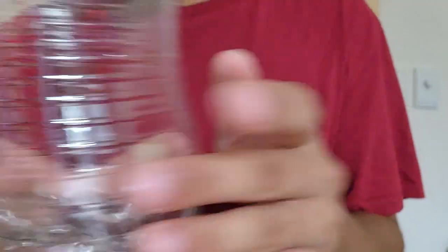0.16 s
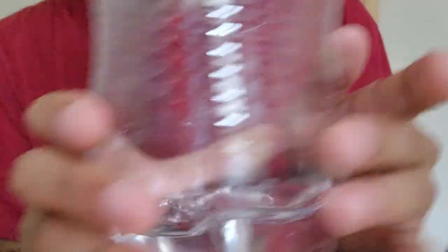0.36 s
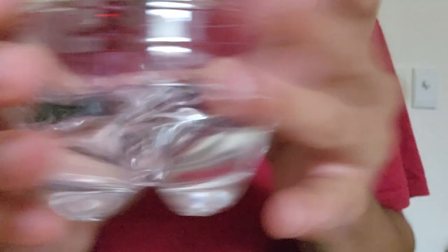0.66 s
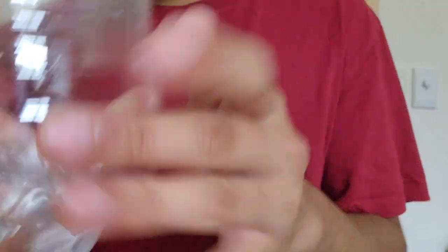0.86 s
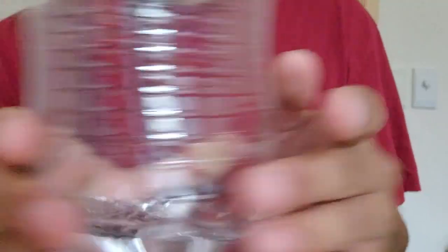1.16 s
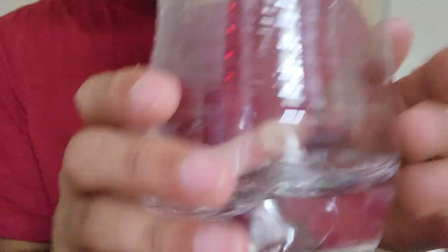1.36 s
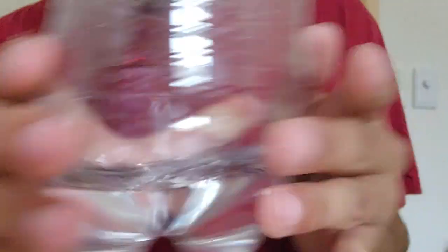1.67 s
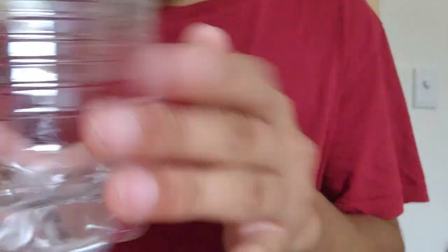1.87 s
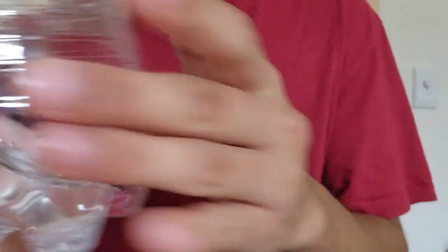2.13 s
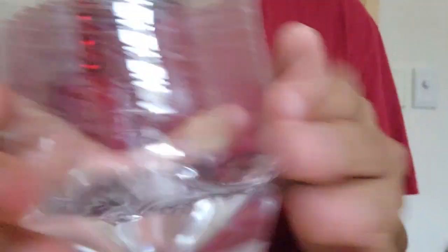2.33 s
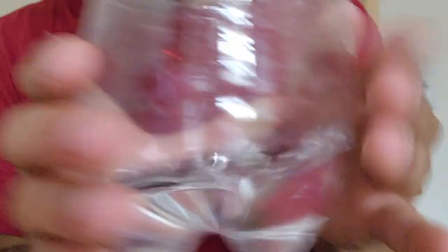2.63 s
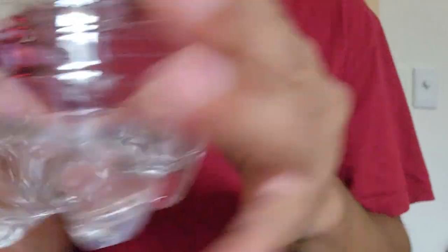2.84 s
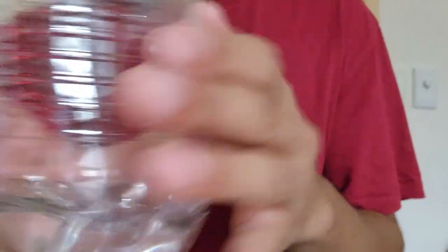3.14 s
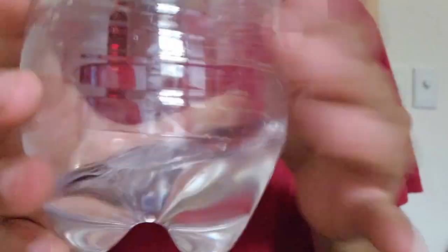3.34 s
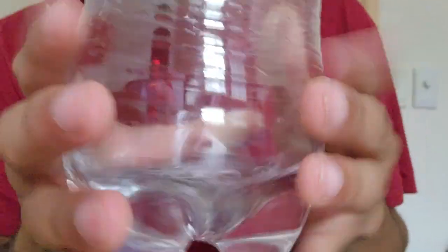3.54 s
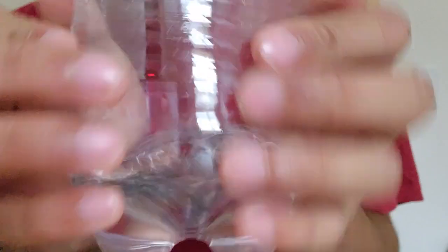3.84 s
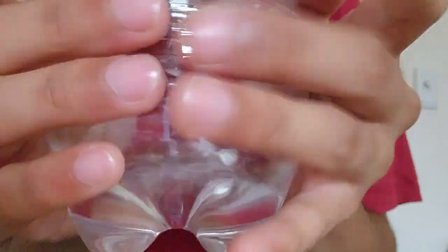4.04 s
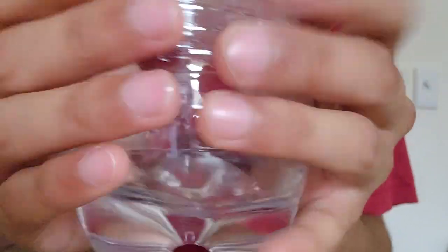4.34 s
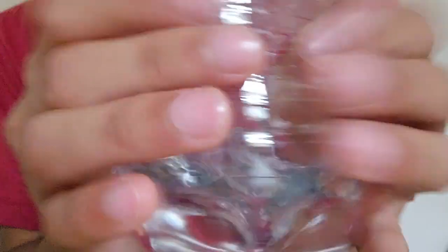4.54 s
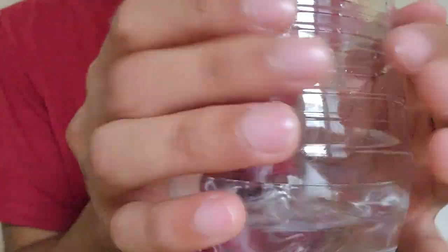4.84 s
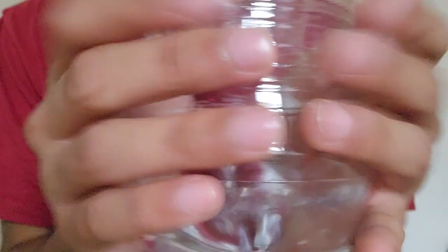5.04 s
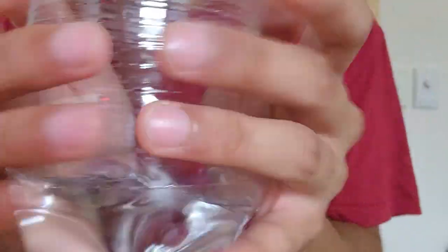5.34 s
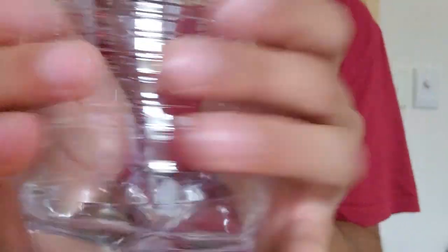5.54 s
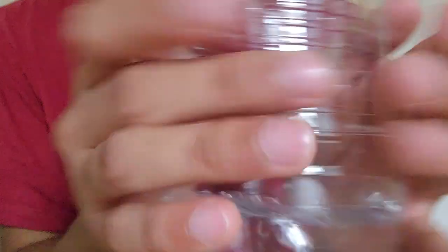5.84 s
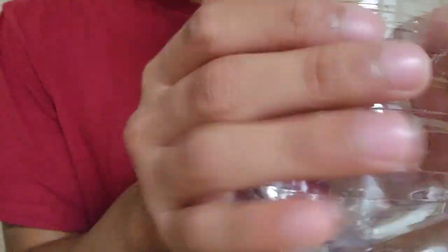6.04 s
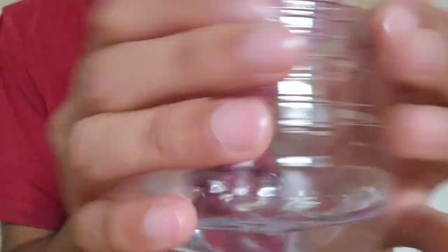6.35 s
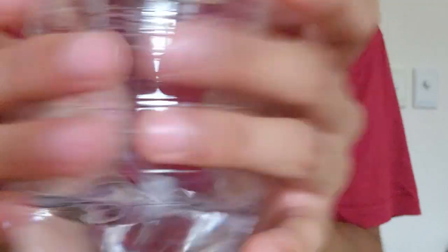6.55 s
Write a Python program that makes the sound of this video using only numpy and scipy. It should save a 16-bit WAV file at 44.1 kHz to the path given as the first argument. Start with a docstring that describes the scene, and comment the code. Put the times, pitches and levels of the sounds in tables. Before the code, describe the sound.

Close, quick crackling taps and soft thumps on a ridged plastic bottle turn into denser, brighter crunching as hands squeeze it.

```python
"""Sharp cracks and hollow knocks: fingers drum on a thin ridged plastic bottle, then squeeze it.
Each blow snaps the wall, knocks the shell's modes, pushes a low puff of air and stirs the air and
water inside. Between blows, creases snap and tick, skin slides on the plastic and the held bottle
rumbles. It is right at a faintly hissing microphone in a small room."""
import sys
import numpy as np
from scipy import signal
from scipy.fft import rfft, irfft
from scipy.io import wavfile
from scipy.ndimage import uniform_filter1d

SR = 44100
rng = np.random.default_rng(int(sys.argv[2]) if len(sys.argv) > 2 else 0)


def digitize_waveform(pressure):
    """Quantize a signal to 16-bit integers and store it at the path in sys.argv[1].

    Rows of a 2-D input are taken as channels; values are limited to [-1, 1].
    """
    field = np.atleast_2d(pressure).T
    bounded = np.clip(field, -1, 1)
    quanta = np.round(bounded * 32767).astype(np.int16)
    wavfile.write(sys.argv[1], SR, quanta)


N = 295470
SQUEEZE_S = 4.0  # from here both hands wrap the wall and squeeze
TAILS = 3  # random room tails, shared in turn among the cracks

# Finger blows that dent the wall: (time [s], crack level [dB], nominal crack length [ms],
# knock over crack [dB], spot pitch [Hz], brightness [dB], thump level [dB], thump pitch [Hz])
BLOWS = [(0.0329, -16.5, 6.3, -17, 604, -30, -12.5, 56), (0.1404, -22, 3.3, -3.5, 1500, -2, -14, 74.5),
         (0.2106, -18.5, 4.7, -10, 470, -4.5, -12.5, 80.7), (0.329, -16.5, 1.7, -10, 746, -3, -16.5, 72),
         (0.4005, -19, 4.1, -2, 512, -1, -14, 81.3), (0.4968, -16.5, 2.6, -6.5, 960, -2.5, -14.5, 50),
         (.581, -18, 5, -18, 1170, -10, -15, 68.6), (0.652, -9.5, 5.5, -2, 659, -4.5, -8.5, 99),
         (.739, -9, 2.1, -25, 1080, -7, -14.5, 81.5), (0.752, -32, 9.3, 0, 810, -2, -13.5, 50.4),
         (0.8394, -29.5, 2.5, -7.5, 885, 0, -21, 62.5), (0.8958, -17, 6.4, -33, 875, -6, -15, 55),
         (0.9784, -14, 4.2, -22, 647, -3.5, -7.5, 75), (1.0481, -18.5, 7, -9, 535, -12, -10, 54.4),
         (1.151, -23.5, 7.1, -4, 990, -17, -19.5, 53), (1.211, -21, 5.5, -5, 543, -2, -15, 84),
         (1.2927, -11, 3.3, -2.5, 480, -2, -12.5, 96.4), (1.378, -17.5, 4.8, -7.5, 503, -5.5, -16.5, 81.5),
         (1.4652, -18, 4.1, -1.5, 786, -6.5, -18.5, 100), (1.5455, -18, 3.6, -4, 685, -4.5, -25, 86),
         (1.6329, -17.5, 7.4, -4.5, 704, -5, -14.5, 74), (1.704, -22, 5.6, -9.5, 1060, -7, -19, 66),
         (1.7912, -17, 6, 0.5, 690, -9.5, -14.5, 81), (1.872, -17, 3.1, -5, 556, -9, -13.5, 80),
         (1.969, -19.5, 4.8, 1.5, 593, -4, -13.5, 84.4), (2.0246, -14, 2.8, -2.5, 515, -4.5, -9.5, 113.6),
         (2.127, -30.5, 3.4, -6.5, 600, -5, -31, 73), (2.1807, -19, 4.7, -17, 484, -4, -12, 62.4),
         (2.2628, -14, 4.7, -1, 673, -2.5, -6.5, 79.6), (2.322, -18.5, 4.5, -24, 480, -9, -16, 74.6),
         (2.407, -10.5, 3.1, -2.5, 693, -6, -8.5, 70), (2.4959, -28, 2.3, -4, 525, -19, -22, 71),
         (2.5767, -13.5, 6.6, -1, 582, -7, -7.5, 73), (2.628, -17, 0.77, -53, 805, -12, -17, 77.5),
         (2.7123, -13, 6.1, -5.5, 670, -7.5, -18, 72), (2.7841, -20, 3.8, -14, 626, -6.5, -18.5, 63.6),
         (2.878, -8.5, 5, -2.5, 530, -5.5, -8.5, 66.4), (2.944, -13.5, 2.4, -31, 590, -3.5, -11.5, 77),
         (2.956, -20, 9.4, 2, 565, -7, -11.5, 50.4), (3.183, -24, 4.1, -0.5, 780, -5, -11, 66),
         (3.204, -8.5, 4.5, 6, 915, -2.5, -3, 55.6), (3.403, -14.5, 4, 0.5, 784, -4.5, -12.5, 104),
         (3.501, -20.5, 7.4, -8, 725, 0.5, -13.5, 76), (3.5892, -23.5, 9.5, -2, 562, 0, -17, 42.6),
         (3.6069, -13, 4.5, -4.5, 834, -2, -7, 77), (4.1032, -26.5, 8.8, -4, 830, -10, -17, 49.3),
         (4.181, -11.5, 2.5, -7, 850, 0, -14.5, 56.7), (4.2543, -18.5, 6, -5, 920, -4, -19, 91),
         (4.3498, -18, 4.1, -5, 936, -2, -17, 54), (4.4037, -12, 3.7, -14, 936, -3, -19, 82),
         (4.539, -19, 4, -7.5, 830, -2, -13, 59), (4.636, -15, 2.4, -6.5, 690, -2, -14, 60.6),
         (4.6939, -10, 6.8, -14, 970, -8, -14, 56.4), (4.778, -19.5, 7.6, -3.5, 694, -3.5, -22.5, 83),
         (4.839, -19, 6.4, -16, 670, -4.5, -16.5, 51), (5.0569, -14, 6.1, -6, 460, -5.5, -9.5, 58),
         (5.1302, -8, 7, -5.5, 511, -5, -9.5, 51), (5.261, -12, 6.1, -13.5, 630, -5, -10.5, 51),
         (5.342, -14.5, 6.4, 3.5, 703, -7, -8, 73), (5.4096, -11.5, 5.6, -11.5, 517, -4.5, -10, 53.5),
         (5.553, -17.5, 6.1, -7.5, 694, -2.5, -13.5, 57.5), (5.645, -36, 4.3, 6, 920, -17, -24, 61.3),
         (5.712, -8.5, 11.2, -15, 600, -5, -8.5, 47.6), (5.8019, -24, 1, -1, 704, -13, -16, 47),
         (5.8592, -7, 4.4, -13, 620, -7, -13, 55), (6.0063, -15.5, 2.6, -8.5, 645, -4, -16.5, 71),
         (6.099, -18, 3.8, -4.5, 796, -5, -12, 57), (6.169, -6.5, 10.7, -9, 775, -4, -12, 53),
         (6.4046, -29.5, 5.4, 3.5, 800, -2.5, -18, 57.6), (6.6161, -7, 5, -10, 920, -4.5, -11, 54.7)]
def blows():
    """Each finger blow cracks a wall panel and knocks the shell; squeezed panels sing higher, sharper."""
    out = np.zeros((TAILS, N))
    for k, (s, db, length_ms, knock_db, spot_hz, bright_db, _, _) in enumerate(BLOWS):
        centre_hz, peak_db = (2720, 3.5) if s < SQUEEZE_S else (3550, 8.5)
        panel_hz = centre_hz * 2 ** rng.normal(0, 0.55)
        add(out[k % TAILS], s, crack(db, length_ms, bright_db, panel_hz, peak_db, width_oct=0.39))
        add(out[k % TAILS], s, knock(db + knock_db, spot_hz))
    return out


# Snapping creases: (time [s], crack level [dB], panel pitch [Hz], knock level [dB])
CREASES = [(0.099, -25.5, 4820, -29.5), (0.2266, -30, 2590, -45), (0.276, -27, 4030, -39),
           (0.4155, -33, 4110, -26), (0.4535, -29, 2920, -31), (1.1025, -30, 2300, -28.5),
           (1.2224, -24, 3870, -33), (1.2595, -31, 2210, -32), (1.4294, -31, 2540, -33),
           (1.7547, -30.5, 2300, -35), (1.844, -35, 2750, -31.5), (1.911, -26.5, 2250, -27.5),
           (1.9857, -33, 2240, -35), (2.0652, -28.5, 2480, -47), (2.2146, -23, 2300, -29),
           (2.3755, -28.5, 2740, -32), (3.1031, -27.5, 2760, -23.5), (3.2755, -27, 2310, -27),
           (3.304, -21.5, 5000, -21), (3.3232, -22.5, 8560, -26), (3.3593, -33, 2800, -29.5),
           (3.5142, -18.5, 2230, -20.5), (3.7212, -22, 4820, -25), (4.1184, -29, 4140, -52),
           (4.132, -25.5, 3460, -55), (4.1692, -26, 3680, -35), (4.2135, -20.5, 4050, -38),
           (4.2466, -21, 4070, -37), (4.2627, -21, 2480, -33), (4.275, -24, 2930, -26.5),
           (4.474, -18.5, 4080, -40), (4.4977, -24, 2330, -33), (4.5517, -17.5, 3320, -40),
           (4.565, -27.5, 3560, -46), (4.5996, -22, 4850, -33), (4.6078, -23, 3500, -35),
           (4.629, -16, 2670, -28), (4.6404, -22, 4400, -38), (4.706, -22, 3500, -26),
           (4.7523, -21, 4800, -26.5), (4.8209, -26, 2280, -34), (4.8785, -21.5, 3750, -39),
           (4.8934, -29.5, 2380, -41), (5.066, -32, 4460, -34), (5.1054, -27.5, 2200, -33),
           (5.1622, -23, 2270, -41), (5.287, -22.5, 4470, -46), (5.3091, -24, 2450, -33),
           (5.3893, -29, 6000, -24), (5.456, -20.5, 4540, -35), (5.6052, -21, 4050, -32.5),
           (5.6254, -26.5, 7200, -40), (5.6754, -29, 3010, -35), (5.7667, -22, 2290, -30),
           (5.7954, -19, 2810, -42), (5.8354, -23, 2960, -42), (5.8542, -12.5, 3020, -17),
           (5.919, -22.5, 3500, -38), (5.954, -24.5, 8220, -31), (5.9803, -33, 3015, -35),
           (6.0159, -10, 3340, -23.5), (6.0276, -23, 4310, -44), (6.0695, -20.5, 2800, -46),
           (6.1439, -24, 2870, -27.5), (6.2142, -25.5, 4510, -35), (6.24, -24.5, 8290, -29),
           (6.2543, -23, 2410, -31), (6.2668, -21, 3230, -29.5), (6.304, -26, 2780, -39),
           (6.326, -24, 4600, -34), (6.3417, -28, 3380, -50)]
def creases():
    """Creases crack and knock without moving the wall much."""
    out = np.zeros((TAILS, N))
    for k, (s, db, panel_hz, knock_db) in enumerate(CREASES):
        length_ms = 5 * 2 ** rng.normal(0, 0.4)
        snap = crack(db, length_ms, bright_db=-4.5, panel_hz=panel_hz, peak_db=7.5, width_oct=0.72)
        add(out[k % TAILS], s, snap)
        add(out[k % TAILS], s, knock(knock_db, spot_hz=559))
    return out


# Spectrum of cracking plastic: (frequency [Hz], level [dB])
CRACK_SPECTRUM = [(300, -11), (1200, 4), (2500, -1.5), (4000, -1), (6500, 0.5), (8800, 12.5), (11000, 6),
                  (16000, -4.5)]
def crack(db, length_ms, bright_db, panel_hz, peak_db, width_oct):
    """Plastic gives way in a volley of uneven slips, hardest at first; the wall buzzes on, duller."""
    t = np.arange(2048) / SR
    noise, slips = rng.standard_normal((2, len(t)))
    panel = [(panel_hz / 2 ** width_oct, 0), (panel_hz, peak_db), (panel_hz * 2 ** width_oct, 0)]
    burst = unit_rms(shaped(shaped(noise, panel), CRACK_SPECTRUM, tilt_db=0.9 * (bright_db - 3.5)))
    ragged = gain(10.35 * np.tanh(0.68 * unit_rms(uniform_filter1d(slips, size=12))))
    volley = (1 + 0.62 * np.exp(-t / 0.00063)) * np.exp(-(t / (0.00068 * length_ms)) ** 1.42)
    buzz_fade = 0.38 * np.exp(-t / 0.0061) + 0.052 * (1 - t / t[-1])
    buzz = buzz_fade * uniform_filter1d(burst[::-1], size=3)
    rise_s = 0.00063 * (length_ms / 6.04) ** 1.92  # long cracks build slowly
    return gain(db - 5.5) * rise(t, rise_s) ** 2 * (burst * ragged * volley + buzz)


# Shell modes: (frequency [Hz], level [dB], t60 [s])
SHELL_MODES = [(310.5, -4.5, 0.32), (484.5, 2.5, 0.13), (615, -0.5, 0.11), (812.5, 0.5, 0.014),
               (917, -1.5, 0.19), (1292, -1, 0.16), (2277, 4.5, 0.059), (2770, 8, 0.027)]
def knock(db, spot_hz):
    """The dent pops and knocks modes near its pitch; they ring on faintly, blurred by the moving hands."""
    t = np.arange(4400) / SR
    out = gain(5.5) * decay(t, 0.023) * np.sin(2 * np.pi * spot_hz * t)
    for hz, mode_db, t60_s in SHELL_MODES:
        detune, strength = rng.uniform(-0.5, 0.5, 2)
        coupling_db = max(-14 * np.log2(hz / spot_hz) ** 2, -18)
        hit_phase = 2 * np.pi * (hz * (1 + 0.14 * detune) * t + rng.random())
        hit = gain(coupling_db) * decay(t, 0.039) * np.sin(hit_phase)
        ring_phase = 2 * np.pi * hz * (1 + 0.032 * detune) * t
        blur = [np.interp(0.198 * hz * t, np.arange(96), row) for row in rng.standard_normal((2, 96))]
        blurred = blur[0] * np.sin(ring_phase) + blur[1] * np.cos(ring_phase)
        ring = gain(0.46 * coupling_db - 17) * decay(t, t60_s) * blurred
        out += gain(mode_db + 6 * strength) * (hit + ring)
    out *= rise(t, 0.0017)
    return gain(db + 1.5) * out / abs(out).max()


# Low thumps of the wall between finger blows, some beside a crease snap:
# (time [s], peak [dB], settled pitch [Hz], t60 [s])
WALL_THUMPS = [(0.114, -17, 56.7, 0.33), (0.224, -12, 49.6, 0.024), (0.919, -19, 66.6, 0.15),
               (1, -19.5, 61.6, 0.94), (2.039, -7.5, 51, 0.058), (3.07, -11.5, 72, 0.38),
               (3.735, -20, 151, 0.016), (3.744, -10.5, 67, 0.074), (3.794, -17, 52.5, 0.049),
               (6.259, -16, 49.5, 0.04)]
def thumps():
    """The wall pushes air at and between blows: a dip, then a swing whose pitch sags as it slackens."""
    out, t = np.zeros(N), np.arange(8000) / SR
    pushes = []
    for s, _, length_ms, *_, db, hz in BLOWS:
        lag_ms = length_ms - 2.52  # longer crack, later thump
        t60_s = 0.052 * gain(-0.71 * (db + 18.5))  # the finger damps a harder blow sooner
        pushes.append((s + lag_ms / 1000, db, hz, t60_s))
    for s, db, hz, t60_s in pushes + WALL_THUMPS:
        cycles = hz * (t + 0.00852 * rise(t, 0.011))
        fade = decay(t, t60_s) + 0.021 * decay(t, 6.2 * t60_s)
        swing = -np.sin(2 * np.pi * cycles) * rise(t, 0.0062) ** 2 * fade
        add(out, s, gain(db) * swing / abs(swing).max())
    return out


# Spectrum of the air and water inside: (frequency [Hz], density [dB])
HOLLOW_SPECTRUM = [(130, 13), (220, 15.5), (330, -8), (480, 15.5), (650, -0.5), (1000, -37)]
def hollow():
    """Each blow stirs the air and water: a brief, rough, low murmur, weaker once the hands wrap round."""
    kicks, t = np.zeros(N), np.arange(8000) / SR
    for s, *_, thump_db, _ in BLOWS:
        kicks[round(s * SR)] = gain(thump_db - (15.5 if s < SQUEEZE_S else 24))
    swell = signal.oaconvolve(kicks, rise(t, 0.0047) * decay(t, 0.15))[:N]
    return swell * shaped_noise(HOLLOW_SPECTRUM)


# Spells of handling: (start [s], end [s], relative crinkle level [dB], rumble level [dB])
SPELLS = [(0, 1.5, -59, -34.5), (1.5, 3.1, -46, -32.5), (3.102, 3.72, -37, -26.5), (3.74, 3.98, -41, -30),
          (4.1, 4.46, -33.5, -33), (5.07, 5.44, -37.5, -25), (5.57, 5.83, -37.5, -35),
          (6.6, 6.8, -19.5, -31)]
def handling():
    """Rub, crinkle and rumble levels in dB over time; each blow stirs them, then the wall settles."""
    t = np.arange(N) / SR
    levels = np.full((2, N), [[-63.0], [-41.0]])  # between spells
    for start, end, crinkle_db, rumble_db in SPELLS:
        levels[:, (t >= start) & (t <= end)] = [[crinkle_db], [rumble_db]]
    crinkle_db, rumble_db = uniform_filter1d(levels, round(0.081 * SR), axis=1)  # the grip eases
    onsets = np.array([0] + [s for s, *_ in BLOWS])
    since_s = t - onsets[np.searchsorted(onsets, t, side="right") - 1]
    until_s = np.append(onsets, np.inf)[np.searchsorted(onsets, t)] - t
    settled = uniform_filter1d(0.5 - np.exp(-since_s / 0.033), size=200)
    creep_db = 39.5 * np.exp(-until_s / 0.0027)  # squeezed creases tick louder just before giving way
    crinkle_db += np.where(t < SQUEEZE_S, -7.5 * settled, creep_db - 4 * settled)
    return -49.5 - 7 * settled, crinkle_db, rumble_db - 12.5 * settled


def crinkle(db, ticks_per_s=420, tick_s=0.00088):
    """Small creases tick at random in three pitch bands, one row each."""
    bands = []
    for hz in (2300, 4200, 8800):
        sizes = gain(5.9 * np.minimum(rng.exponential(1, N), 3.5))
        ticks = sizes * (rng.random(N) < ticks_per_s / SR)
        envelope = signal.lfilter([1], [1, -np.exp(-1 / (tick_s * SR))], ticks)
        bands.append(envelope * shaped_noise([(0.11 * hz, -20), (hz, 0), (1.4 * hz, -12), (SR / 2, -24)]))
    return gain(db - 25) * np.array(bands)


# Palm slides along the wall: (peak time [s], rub level [dB])
SLIDES = [(3.65, -44.5), (3.905, -39)]
# Spectrum of skin on plastic: (frequency [Hz], density [dB])
RUB_SPECTRUM = [(200, 1), (500, 10), (1800, 3), (4000, 1), (9000, -3.5), (13000, -14.5), (16500, -34)]
def rub(resting_db, slide_db_per_s=77):
    """Skin hisses on the plastic; a faster slide is louder and brighter."""
    t = np.arange(N) / SR
    slide_db = np.max([db - slide_db_per_s * abs(t - s) for s, db in SLIDES], axis=0)
    rub_db = np.maximum(resting_db, slide_db)
    airy = gain(rub_db + 43) * unit_rms(np.diff(rng.standard_normal(N), prepend=0))
    return gain(rub_db) * (shaped_noise(RUB_SPECTRUM) + airy)


def rumble(db):
    """The held bottle rumbles, strongest near 55 Hz."""
    return gain(db) * shaped_noise([(28, -16), (55, 7.5), (90, -4.5), (170, -11), (320, -61)])


# Decay of the small room: (frequency [Hz], t60 [s])
ROOM_T60 = [(300, 1), (1700, 0.37), (5000, 0.24), (10000, 0.31), (15000, 0.1)]
def room(x):
    """Sparse reflections of random sign, each band dying at its own speed."""
    taps = np.zeros(SR // 2)
    slots = np.arange(200, len(taps) - 20, 20)
    taps[slots + rng.integers(0, 20, len(slots))] = rng.choice([-1., 1.], len(slots))
    hz, t, bands = signal.stft(taps, SR, nperseg=256)
    _, tail = signal.istft(bands * decay(t, curve_at(ROOM_T60, hz)[:, None]), SR, nperseg=256)
    response = shaped(tail / np.linalg.norm(tail), [(900, -9), (2200, 0)])  # the shell sends little bass
    return signal.fftconvolve(x, response)[:N]


def gain(db):
    """dB to amplitude."""
    return 10 ** (np.asarray(db) / 20)


def rise(t, tau_s):
    """Exponential rise from 0 to 1."""
    return 1 - np.exp(-t / tau_s)


def decay(t, t60_s):
    """Exponential fall, 60 dB in t60_s."""
    return gain(-60 * t / t60_s)


def unit_rms(x):
    """Scales to rms 1."""
    return x / np.sqrt(np.mean(x ** 2) + 1e-20)


def curve_at(points, hz):
    """Interpolates on a log-frequency axis."""
    points_hz, values = np.transpose(points)
    return np.interp(np.log(hz + 1), np.log(points_hz + 1), values)


def shaped(x, spectrum, tilt_db=0):
    """Filters by (frequency [Hz], level [dB]) points, tilted about 7 kHz."""
    hz = np.fft.rfftfreq(len(x), 1 / SR)
    shelf_db = tilt_db * np.tanh(np.log((hz + 1) / 7000) / 0.14)
    return irfft(rfft(x) * gain(curve_at(spectrum, hz) + shelf_db), len(x))


def shaped_noise(spectrum):
    """N samples of filtered noise, rms 1."""
    return unit_rms(shaped(rng.standard_normal(N), spectrum))


def add(mix, s, sound):
    """Mixes a sound in at s seconds."""
    part = mix[round(s * SR):][:len(sound)]
    part += sound[:len(part)]


def scene():
    """The sharp sounds go in three groups, each with a random room tail; the rest stays dry."""
    rub_db, crinkle_db, rumble_db = handling()
    groups = blows() + creases() + crinkle(crinkle_db)
    sharp = sum(group + gain(-12) * room(group) for group in groups)
    return (sharp + thumps() + hollow() + rub(rub_db) + rumble(rumble_db))[None]


def record(dry):
    """Microphone hiss and bass cut, a preamp that rounds the highest peaks, then a 16 kHz band limit."""
    hiss = gain(-64) * shaped_noise([(1500, 3), (6000, -9), (16000, 12)])
    bass_cut = signal.butter(3, 36, "highpass", fs=SR, output="sos")
    rounded = 1.15 * np.tanh(signal.sosfilt(bass_cut, dry + hiss) / 1.15)
    band_limit = signal.firwin(255, 16000, window=("kaiser", 12), fs=SR)
    return signal.oaconvolve(rounded, band_limit[None], "same")


dry = scene()
out = record(dry)
digitize_waveform(out)
```